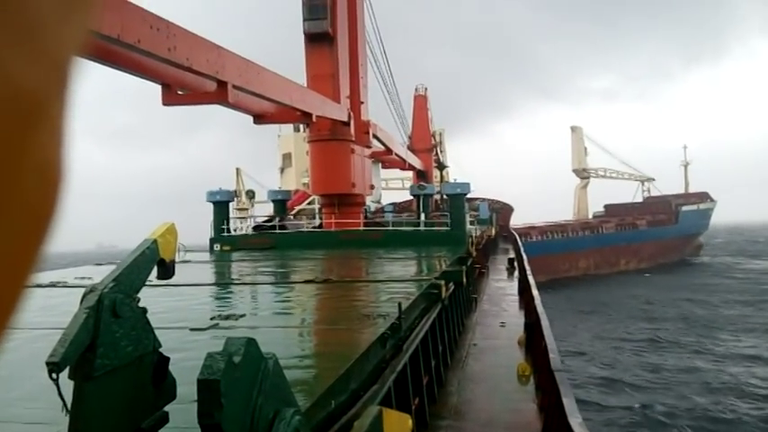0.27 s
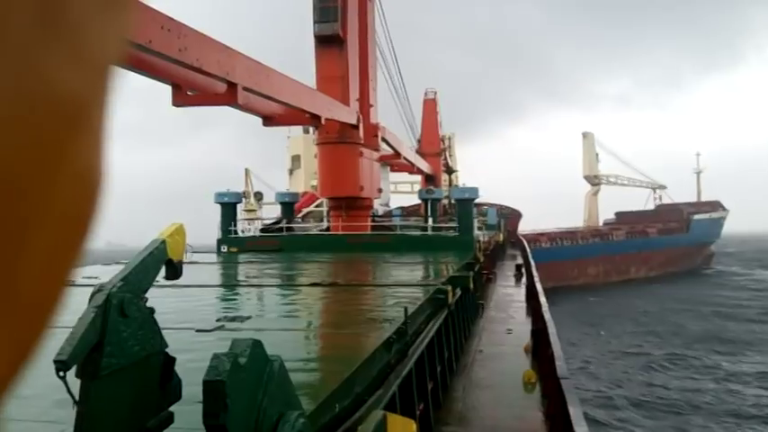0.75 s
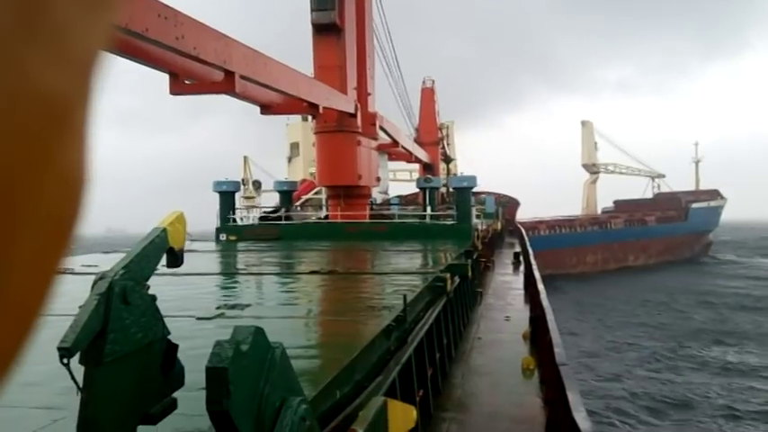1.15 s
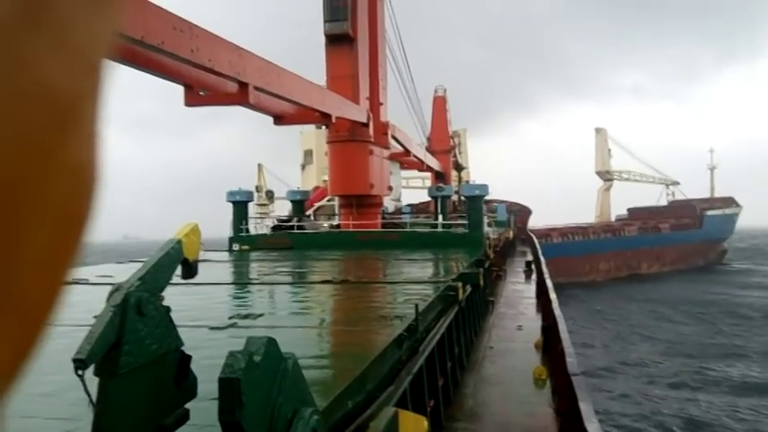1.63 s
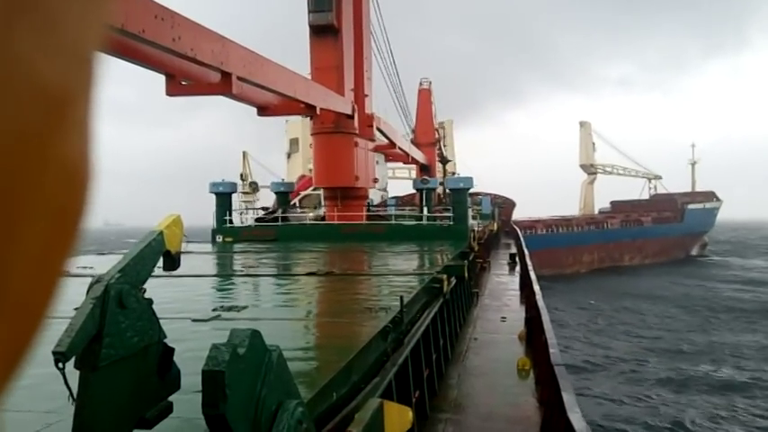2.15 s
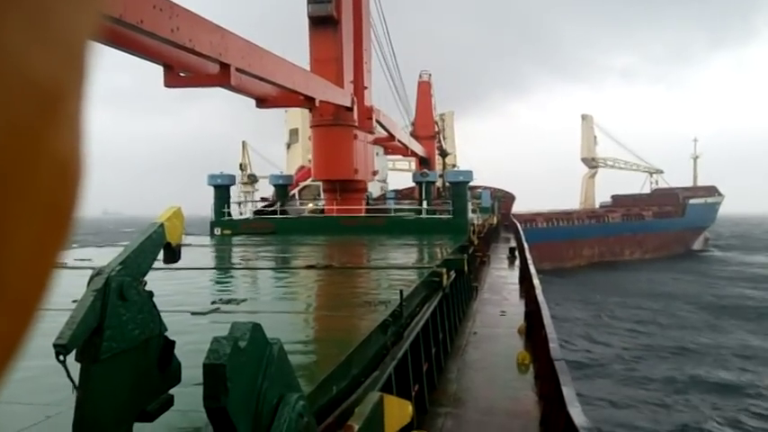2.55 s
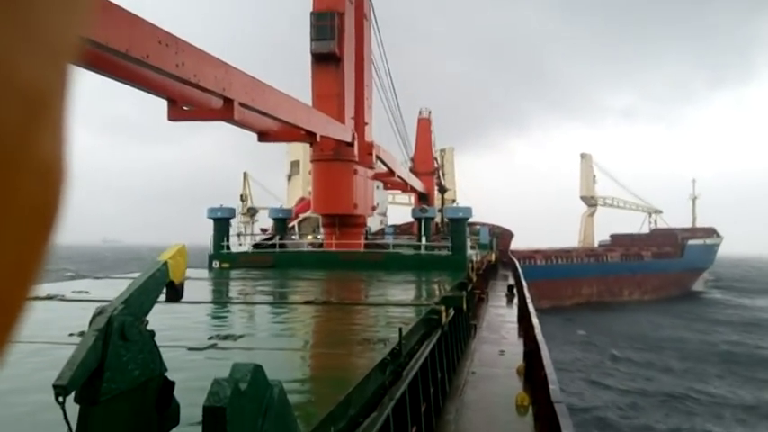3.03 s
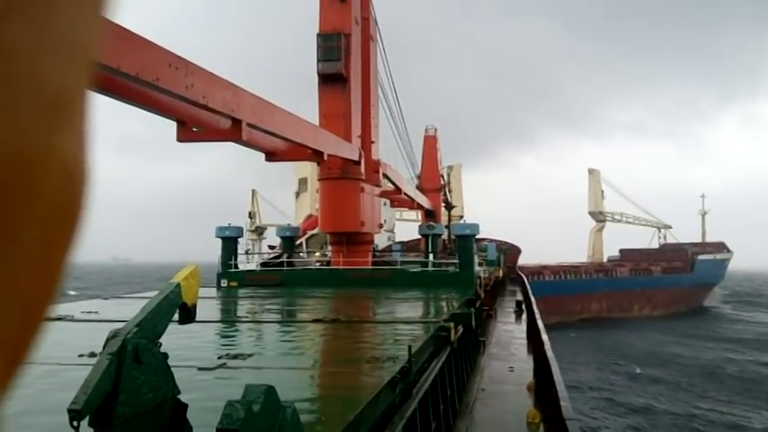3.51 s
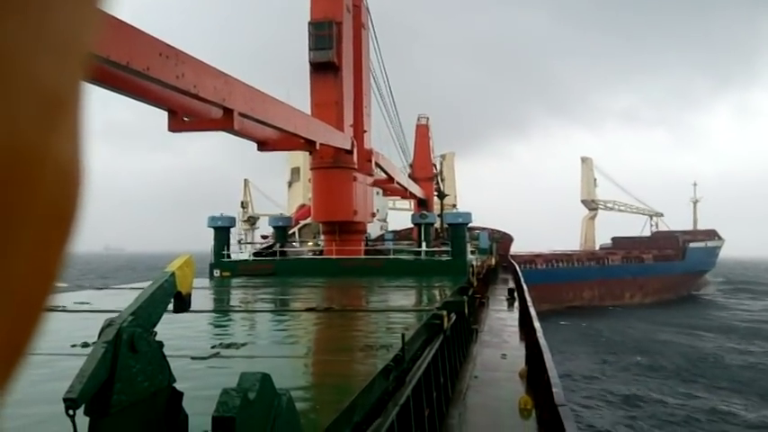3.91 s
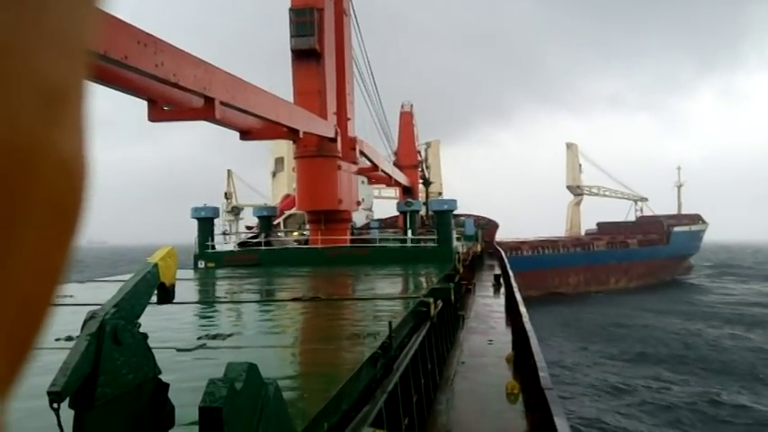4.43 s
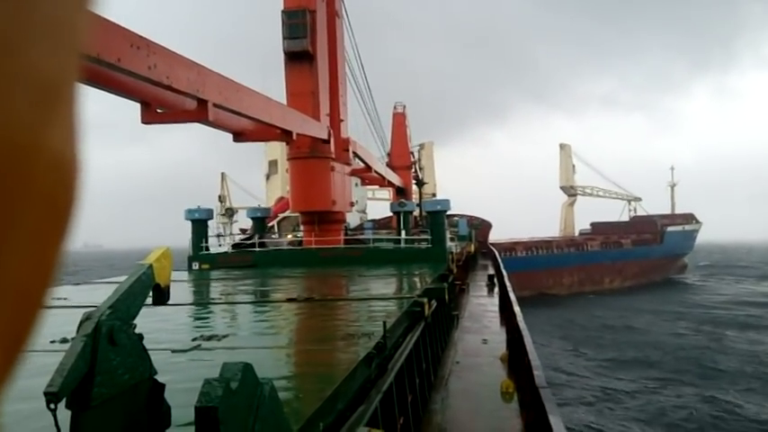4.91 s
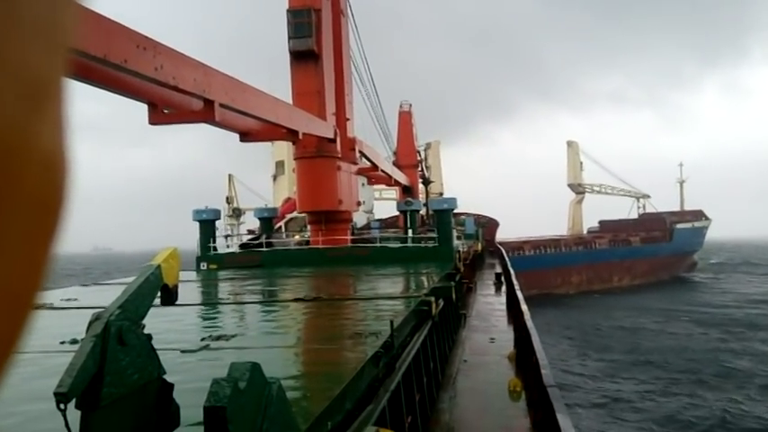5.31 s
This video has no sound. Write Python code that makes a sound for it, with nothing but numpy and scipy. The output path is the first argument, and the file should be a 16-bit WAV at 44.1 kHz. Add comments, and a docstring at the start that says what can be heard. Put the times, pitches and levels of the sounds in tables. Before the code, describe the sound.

On the open deck of a cargo ship in a gale, wind roars into a hand-held camera's two microphones. Low rumble and thumps differ left and right. Faint finger rubbing and a tiny spray tick open it, then gusts overload the right side with harsh crackles, worst near two seconds, before thinning to rougher rumble and a last brush of the hand.

```python
"""A gale on the open deck of a cargo ship buffets the two microphone ports of a hand-held camera.
From the start each port rumbles with its own flow and eddies, over a rush of sea and rigging that settles
after a surge. Fingers brush the case and a drop of spray ticks on it, both short filtered hisses. Strong
gusts then overload the input, with bursts of pressure spikes on the right port that reach into the treble;
later the spikes thin out, and one last, louder brush comes just before the end."""
import sys
import numpy as np
from scipy import signal
from scipy.fft import rfft, irfft, next_fast_len
from scipy.io import wavfile
from scipy.ndimage import uniform_filter1d, minimum_filter1d, map_coordinates

SR = 44100
rng = np.random.default_rng(int(sys.argv[2]) if len(sys.argv) > 2 else 0)


def wav_record(signal):
    """Record a signal, one row per channel, as 16-bit PCM in the file named by sys.argv[1]."""
    frames = np.transpose(np.atleast_2d(signal))
    bounded = np.clip(frames, -1, 1)
    # unit amplitude maps onto the largest positive 16-bit level
    quanta = np.round(bounded * 32767).astype(np.int16)
    wavfile.write(sys.argv[1], SR, quanta)


N = 245195

# a moderate wind (dB): the laws of brightness and of swing speed count from here
BREEZE_DB = -20


def amp(db):
    """Decibels to gain."""
    return 10 ** (np.asarray(db) / 20)


def unit(x):
    """x at rms 1."""
    return x / np.sqrt(np.mean(x ** 2) + 1e-20)


def along(points, hz):
    """(Hz, value) points read on a log frequency axis."""
    f, v = np.transpose(points)
    return np.interp(np.log(hz + 1), np.log(f + 1), v)


def clock():
    """Time of every sample in seconds."""
    return np.arange(N) / SR


def wobble(rate):
    """A smooth random curve of rms 1, with rate knots a second."""
    knots = rng.standard_normal(int(N * rate / SR) + 4)
    return unit(map_coordinates(knots, [np.arange(N) * rate / SR]))


def filtered(x, response):
    """x times a gain that depends on frequency."""
    m = next_fast_len(N + SR // 4)
    gain = response(np.fft.rfftfreq(m, 1 / SR))
    return irfft(rfft(x, m) * gain, m)[..., :N]


def noise(spectrum):
    """Noise of rms 1 with the given colour."""
    return unit(filtered(rng.standard_normal(N), lambda hz: amp(along(spectrum, hz))))


def spike(spectrum, size=1024):
    """A one-sided pressure spike with the given colour and the energy of a millisecond at rms 1."""
    log_gain = np.log(amp(along(spectrum, np.fft.rfftfreq(size, 1 / SR))))
    # folding the cepstrum forward in time gives minimum phase: the spike starts at once
    cepstrum = irfft(log_gain)
    cepstrum[1:size // 2] *= 2
    cepstrum[size // 2 + 1:] = 0
    shape = irfft(np.exp(rfft(cepstrum)))
    return shape / np.linalg.norm(shape) * np.sqrt(SR / 1000)


def gusts(flow):
    """Strength of the wind (dB) at every sample."""
    return np.interp(clock(), *np.transpose(flow))


def eddies(port, flow, big_corner_hz, small_corner_hz, small_db, spread_db, small_length, count=45):
    """Big eddies of one port, and small ones shed at random: (s, level dB, half length s, breeze corner Hz)."""
    # Big eddies, each a separate thump. Each row: time in seconds, level in dB before the port's trim,
    # half length in seconds, brightness in octaves from the port's corner, port that it hits.
    thumps = [(0.028, -14.5, 0.02, -0.5, "L"), (0.131, -5.5, 0.013, -0.1, "R"),
              (0.159, -3.5, 0.0045, -0.5, "R"), (0.188, -16.5, 0.01, -1, "L"),
              (0.297, -14, .014, -0.8, "R"), (0.367, -12.5, 0.017, 0.1, "L"),
              (0.394, -9.5, .012, -1.5, "R"), (0.512, -10.5, 0.012, 0.06, "R"),
              (0.603, -6.5, 0.011, -1, "R"), (0.636, 1, 0.0096, 1.2, "L"), (0.637, -10, 0.015, 0.5, "R"),
              (0.688, -10, 0.02, -0.5, "R"), (0.689, -9.5, 0.014, -0.5, "L"), (.73, -7.5, .008, -0.5, "R"),
              (0.785, -5.5, .007, 0, "L"), (0.807, 4, 0.0099, 0.5, "L"), (0.828, -3.5, 0.0091, 0.3, "R"),
              (0.852, -15, 0.0086, 2, "L"), (0.923, -3.5, 0.0051, 7, "L"), (0.905, -4.5, 0.011, 1, "R"),
              (0.971, 1, 0.0066, 0.6, "R"), (1.038, -3, 0.016, -1.3, "L"), (1.032, -12, 0.018, -2.5, "R"),
              (1.07, -5, .005, 0.5, "L"), (1.088, -4, .007, 2.1, "L"), (1.118, -12, 0.013, 1, "R"),
              (1.134, 0, 0.006, 1, "L"), (1.174, -10.5, 0.006, -6, "L"), (1.175, -5.5, 0.0046, -1.2, "R"),
              (1.218, -10.5, 0.014, -0.5, "R"), (1.327, -10, 0.019, -0.46, "R"),
              (1.354, -3, 0.0035, 1, "L"), (1.4, -16.5, 0.022, 0.4, "R"), (1.406, -7.5, 0.025, -1.5, "L"),
              (1.421, -7, .012, -2, "R"), (1.464, -2.5, 0.01, 0.3, "R"), (1.492, -7.5, 0.0086, -1, "L"),
              (1.525, -7.5, 0.017, 0, "R"), (1.526, -10.5, 0.0065, 0.5, "L"), (1.553, 3.5, 0.004, 8, "R"),
              (1.608, -6, 0.02, 0, "R"), (1.652, -5.5, 0.012, -0.2, "L"), (1.692, -7.5, 0.0047, 4.5, "R"),
              (1.717, -4, 0.01, -4, "R"), (1.747, -11, 0.039, 2.6, "R"), (1.748, -3, 0.0088, -1, "L"),
              (1.809, -12.5, 0.016, -0.8, "L"), (1.844, -6, 0.024, -0.4, "R"), (1.875, -7, 0.015, 2, "L"),
              (1.897, 3.5, 0.012, 8, "R"), (1.922, -6.5, 0.0035, 3, "R"), (1.936, -10, 0.012, 0.5, "L"),
              (1.961, -6.5, 0.025, -0.5, "R"), (1.965, -9.5, 0.0085, .4, "L"), (2.03, -8, 0.015, -0.1, "L"),
              (2.006, -4.5, 0.0073, 1.5, "R"), (2.04, -8.5, 0.0084, 2, "R"), (2.081, -0.5, 0.012, 13, "R"),
              (2.121, -14, 0.015, 1.8, "R"), (2.147, -0.5, 0.0084, -3, "R"),
              (2.177, -2.5, 0.003, -1.3, "R"), (2.206, -9.5, 0.015, -0.5, "L"),
              (2.221, -9.5, 0.012, -1.48, "R"), (2.267, -12.5, 0.0043, -0.3, "R"),
              (2.3, -0.5, 0.0033, -1.2, "R"), (2.338, -7, 0.023, -0.5, "R"), (2.466, -6, 0.018, 0.5, "L"),
              (2.472, -6, 0.015, -0.3, "R"), (2.499, -10.5, 0.008, 1.5, "L"), (2.532, -11, 0.027, -.5, "R"),
              (2.544, -12, 0.01, -0.5, "L"), (2.576, -2.5, 0.0096, 0.3, "R"),
              (2.61, -11.5, 0.0064, -2.2, "R"), (2.627, -5, 0.0049, -0.7, "R"),
              (2.66, -9.5, 0.027, -2, "L"), (2.653, -8, 0.016, -1, "R"), (2.722, -2, 0.0075, 0.6, "R"),
              (2.747, -11, 0.021, -1, "R"), (2.765, -18.5, .011, 0, "L"), (2.826, -5.5, 0.0065, -0.5, "R"),
              (2.848, -11, 0.0074, -0.6, "R"), (2.88, -8, 0.021, -0.6, "L"), (2.905, -4, 0.012, -0.5, "R"),
              (2.943, -5.5, 0.007, -0.5, "R"), (2.977, -10, 0.016, -0.5, "R"),
              (3.024, -7.5, 0.0075, -0.5, "L"), (3.062, -8.5, 0.017, -0.5, "R"),
              (3.079, -9.5, 0.018, 0, "L"), (3.121, -9, 0.0067, 0.5, "R"), (3.139, -5, 0.014, -0.3, "L"),
              (3.221, -8, 0.018, -0.52, "R"), (3.422, -7, 0.015, 0, "L"), (3.417, -14.5, 0.017, 0, "R"),
              (3.456, -12.5, 0.0076, -0.4, "R"), (3.511, -5, 0.003, 0, "L"),
              (3.548, -5.5, 0.005, -0.6, "R"), (3.552, -9.5, 0.019, 0, "L"), (3.587, -11, 0.015, -1, "R"),
              (3.651, -7, 0.012, -1, "R"), (3.673, -12.5, 0.0088, -0.1, "L"),
              (3.684, -10, 0.0059, -1.5, "R"), (3.724, -12, 0.029, -0.65, "R"),
              (3.771, -0.5, 0.0046, 0, "R"), (3.81, -11, 0.017, -1.5, "R"), (3.827, -17, 0.018, -1, "L"),
              (3.835, -3, 0.0066, -1, "R"), (3.855, -12, .01, -0.3, "R"), (3.904, -9.5, 0.0033, -1.5, "R"),
              (4, -18, 0.023, -0.5, "R"), (4.076, -9.5, 0.0062, -0.8, "R"),
              (4.136, -1.5, 0.0029, -0.6, "R"), (4.169, -12, .008, -0.74, "R"),
              (4.228, -10.5, 0.0062, -2, "R"), (4.197, -10.5, 0.0079, -1, "L"),
              (4.271, -18.5, 0.045, -0.7, "R"), (4.285, -16, 0.0087, -0.5, "L"),
              (4.331, -6, .015, -1.1, "R"), (4.367, -9, 0.012, -0.4, "R"), (4.384, -7, 0.0095, -0.95, "R"),
              (4.375, -13.5, 0.012, -2.5, "L"), (4.42, -3.5, 0.0053, 0, "R"),
              (4.509, -14, 0.032, -0.4, "R"), (4.557, -12.5, 0.0078, -.5, "R"),
              (4.575, -1, 0.0082, 0.1, "L"), (4.58, -11, 0.0056, 1, "R"), (4.619, -0.5, 0.0024, 0, "R"),
              (4.662, -8.5, 0.0061, 0, "R"), (4.689, -9, 0.0046, 1.5, "L"), (4.725, -8, 0.026, -0.5, "L"),
              (4.766, -12.5, 0.02, -1.5, "L"), (4.808, -10, 0.015, -0.1, "L"),
              (4.828, -18, 0.012, -0.5, "R"), (4.879, -12, 0.009, -1.8, "R"),
              (4.894, -15, 0.0075, 0.13, "R"), (4.916, -12.5, .014, -0.5, "L"),
              (4.985, -8.5, 0.0028, -.5, "L"), (5.007, -13, 0.011, -.5, "R"), (5.044, 4, 0.0039, -0.5, "R"),
              (5.083, -13.5, 0.009, 0.1, "R"), (5.062, -10, 0.007, 0, "L"), (5.086, -8.5, 0.018, -1, "L"),
              (5.136, -11.5, 0.0051, -0.3, "R"), (5.234, -10, 0.013, 0, "R"), (5.338, -10.5, 0.012, 1, "L"),
              (5.372, -6.5, 0.011, 0, "L"), (5.443, -18, 0.0071, 2.6, "R"), (5.446, -9, 0.0078, -1.5, "L")]
    big = [(s, db, length, big_corner_hz * 2 ** octaves)
           for s, db, length, octaves, side in thumps if side == port]
    times = (np.arange(count) + rng.random(count)) / count * N / SR
    size, stretch = np.clip(rng.standard_normal((2, count)), -2, 2)
    levels = np.interp(times, *np.transpose(flow)) + small_db + spread_db * size
    lengths = small_length * 2 ** (stretch / 2)
    return big + list(zip(times, levels, lengths, np.full(count, small_corner_hz)))


def turbulence(count=14):
    """Port noise cut into overlapping bands: their centres (Hz) and their waveforms."""
    # Turbulent pressure at a port, before the corner takes the treble away.
    # Each row: frequency in Hz, relative level in dB per Hz.
    port_colour = [(20, -25.5), (32, -26), (55, -8.5), (85, -2.5), (150, -1.5), (300, -6), (1000, -10),
                   (2200, -13.5), (4500, -19), (8000, -26), (16000, -23)]
    centres = np.geomspace(40, 14000, count)

    def split(hz):
        """Overlapping triangles on a log axis, which add up to 1."""
        return np.array([np.interp(np.log(hz + 1), np.log(centres), row) for row in np.eye(count)])

    pressure = noise(port_colour)
    # even out its slow swells, so that flow and eddies alone set the level
    pressure /= np.sqrt(np.abs(uniform_filter1d(pressure ** 2, size=SR // 50)) + 1e-9)
    return centres[:, None], filtered(pressure, split)


def buffet(flow, whirls, calm_corner_hz, top_corner_hz, doubling_db, flow_db, eddy_db, swirl_db,
           swirl_brightens, eddy_follows, flutter_db, tear_db, steepness):
    """Wind on one port: faster air holds smaller whirls, so it is both louder and brighter."""
    t = clock()
    centres, bands = turbulence()
    share = np.mean(bands * bands.sum(0), axis=1, keepdims=True)

    def colour(breeze_corner_hz, gust_db):
        """Power gain of each band, keeping the total, for a roll-off whose corner rises with the gust."""
        free_hz = breeze_corner_hz * 2 ** ((gust_db - BREEZE_DB) / doubling_db)
        corner_hz = free_hz / np.hypot(1, free_hz / top_corner_hz)
        power = (1 + (centres / corner_hz) ** 2) ** -steepness
        return power / np.sum(power * share, axis=0)

    wind_db = gusts(flow)
    swirl = swirl_db * wobble(36)
    flow_power = amp(wind_db + swirl + flow_db) ** 2
    power = flow_power * colour(calm_corner_hz, wind_db + swirl_brightens * swirl)

    for s, db, length, corner_hz in whirls:
        near = slice(*np.searchsorted(t, [s - 3 * length, s + 3 * length]))
        age = (t[near] - s) / length
        # an eddy arrives as a steep front and leaves gradually
        front = .5 + .5 * np.tanh(7 * (age + 0.71))
        envelope = front * np.exp(-age ** 2)
        # its brightness follows the gust that carries it by the share eddy_follows
        carried_db = BREEZE_DB + eddy_follows * (np.interp(s, t, wind_db) - BREEZE_DB)
        power[:, near] += amp(db + eddy_db) ** 2 * envelope * colour(corner_hz, carried_db)

    # small whirls come in clumps of a few milliseconds, the more so the higher they sound
    smallness = centres / (centres + 600)
    clump_db = flutter_db * wobble(110) + tear_db * wobble(450)
    # peaks are held to 8 dB before each band returns to rms 1
    clumps = amp(smallness * np.minimum(clump_db, 8))
    clumps /= np.sqrt(np.mean(clumps ** 2, axis=1, keepdims=True))
    return np.sum(bands * np.sqrt(power) * clumps, axis=0)


def sea(spectrum, level_db, swell_db, flicker_db):
    """Breaking waves and wind in the rigging: a rush that settles after a surge and whose treble flickers."""
    surge_start_db, surge_end_db, surge_fall_s = 5.5, 0.4, 0.57  # relative to level_db; time constant
    rush = noise(spectrum)
    body = filtered(rush, lambda hz: 1 / (1 + (hz / 4500) ** 6))
    hiss = (rush - body) * amp(flicker_db * wobble(27))
    surge_db = surge_end_db + (surge_start_db - surge_end_db) * np.exp(-clock() / surge_fall_s)
    swell = swell_db * wobble(6.4)
    return amp(level_db + surge_db + swell) * (body + hiss)


def brushes():
    """Short hisses of skin sliding on the case, some airier than others."""
    # Strokes of the fingers. Each row: time of the peak in seconds, level in dB as heard on the near side,
    # rise and fall time constants in seconds, extra air above 8.5 kHz in dB.
    strokes = [(.01, -49, 0.028, 0.024, 0), (.11, -42, 0.023, .025, 3), (4.62, -48, 0.15, 0.15, 0.5),
               (5.156, -51, .008, .022, 14), (5.493, -32, 0.0057, 0.028, -0.5)]
    # Hiss of a stroke. Each row: frequency in Hz, relative level in dB per Hz.
    skin_colour = [(800, -19.5), (2000, 1), (3500, 8), (6500, -6.5), (8500, -24), (12000, -7), (15500, -12)]
    t = clock()
    hiss = noise(skin_colour)
    air = filtered(hiss, lambda hz: hz > 8500)
    total = np.zeros(N)
    for s, db, rise, fall, air_db in strokes:
        envelope = np.exp(-np.maximum((s - t) / rise, (t - s) / fall))
        total += amp(db) * envelope * (hiss - air + amp(air_db) * air)
    return total


def crackle(flow, onset_db, width_db, peak_db, growth, spread_db, edge_db, count=700):
    """Lesser cracks, denser and harder as a gust climbs past the onset: (s, pop dB, edge dB)."""
    place, chance, size = rng.random((count, 3)).T
    times = (np.arange(count) + place) / count * N / SR
    over_db = np.interp(times, *np.transpose(flow)) - onset_db
    torn = chance < .5 + .5 * np.tanh(over_db / width_db)
    levels = (peak_db + growth * over_db + spread_db * (2 * size - 1))[torn]
    return list(zip(times[torn], levels, levels + edge_db))


def cracks(rows, pop_db, edge_db, slap_db, slap_rise, slap_fall, slap_growth,
           tear_length, tear_doubling_db, count=3):
    """Sharp pressure swings overload the port: a pop, a dull slap and a clipped edge, longer if harder."""
    # Pop of a crack. Each row: frequency in Hz, relative level in dB per Hz.
    pop_colour = [(150, -3), (500, 2), (1000, 2.5), (1500, -3), (2400, -8), (3500, -20.5), (6000, -55),
                  (10000, -72.5)]
    # Hard clipped edge of a crack. Each row: frequency in Hz, relative level in dB per Hz.
    edge_colour = [(200, -17), (1000, -5), (2700, 9), (5000, -0.5), (7000, -9), (10000, -16.5),
                   (15500, -24.5)]
    # Dull slap that comes with a crack. Each row: frequency in Hz, relative level in dB per Hz.
    slap_colour = [(80, -3.5), (250, -3.5), (900, -8), (2000, -18.5), (4000, -40.5), (9000, -64.5)]
    # time between swings in a breeze, its scatter between cracks, loss per swing
    swing_s, scatter_octaves, swing_loss_db = .00055, 0.5, 2.5
    swing_halving_db = 15  # gain in level that halves the time between swings
    hard_db = -40  # an edge of middling hardness: the length of a tear counts from here

    def sample_at(seconds):
        return np.clip((seconds * SR).astype(int), 0, N - 1)

    t = clock()
    pops, edges, slaps = np.zeros((3, N))
    swing = np.arange(count)
    sizes = (-1) ** swing * amp(-swing_loss_db * swing)
    sizes /= np.linalg.norm(sizes)
    snap = np.arange(2 * count)
    chances = rng.uniform(-1, 1, (len(rows), 2 * count + 2))
    for (s, db, row_edge_db), chance in zip(rows, chances):
        # a stronger crack swings faster
        gap = swing_s * 2 ** (scatter_octaves * chance[0] - (db - BREEZE_DB) / swing_halving_db)
        at = sample_at(s + gap * (swing - 1 + chance[2:2 + count] / 4))
        pops[at] += np.sign(chance[1]) * sizes * amp(db + pop_db)

        # the edge is a run of snaps of alternate sign, scattered over the tear
        hardness = 2 ** ((row_edge_db - hard_db) / tear_doubling_db)
        place = (snap + .5 + chance[2:] / 2) / len(snap) - .5
        at = sample_at(s + tear_length * hardness * place)
        edges[at] += (-1) ** snap * amp(row_edge_db + edge_db) * np.sqrt(hardness / len(snap))

        near = slice(*np.searchsorted(t, [s - .02, s + .04]))
        age = t[near] - s
        envelope = np.exp(-np.maximum(-age / slap_rise, age / slap_fall))
        slaps[near] += amp(slap_growth * db + slap_db) * envelope
    snaps = signal.fftconvolve(pops, spike(pop_colour)) + signal.fftconvolve(edges, spike(edge_colour))
    return snaps[:N] + slaps * noise(slap_colour)


def drop(level_db, t60):
    """A drop of spray on the case: a dry tick of noise that falls 60 dB in t60 seconds."""
    # Sound of the tick. Each row: frequency in Hz, relative level in dB per Hz.
    tick_colour = [(600, -25), (2000, -0.5), (4500, 0.5), (8500, -10), (12500, -4), (15500, -5)]
    age = clock() - .413
    return (age > 0) * amp(level_db - 60 * np.abs(age) / t60) * noise(tick_colour)


def scene():
    """The ports share no turbulence; the right one faces the wind, the hand is on the left."""
    # Strength of the gusts over each port. Each row: time in seconds, level in dB before the flow trim.
    left_flow = [(0, -31), (.3, -18.5), (.52, -35), (.68, -17), (1.139, -12.5), (1.25, -19.5), (1.5, -15),
                 (2.2, -17), (2.4, -27), (2.62, -15.5), (2.8, -21), (3.0, -17), (3.2, -18), (3.35, -25),
                 (3.7, -20), (4.15, -21), (4.5, -23.5), (4.8, -11.5), (5.2, -18.5), (5.3, -27),
                 (5.42, -13.5), (5.56, -35)]
    right_flow = [(0, -19), (.28, -16), (.46, -26.5), (.62, -15), (.76, -17.5), (0.831, -13),
                  (0.992, -10.5), (1.051, -17), (1.29, -18), (1.5, -16), (1.76, -12.5), (1.82, -17.5),
                  (1.92, -10.5), (2.1, -12), (2.2, -16), (2.419, -18), (2.6, -15.5), (2.98, -17.5),
                  (3.35, -23.5), (3.75, -14.5), (4.2, -19), (4.37, -16.5), (4.72, -20.5), (5.06, -19.5),
                  (5.34, -31), (5.56, -26.5)]
    # Rush of sea and rigging on each side. Each row: frequency in Hz, relative level in dB per Hz.
    left_sea = [(60, -14), (300, 10), (550, -2.5), (900, -5.5), (1400, -9), (2500, -12), (3400, -19.5),
                (4100, -25.5), (6000, -36.5), (8500, -57), (12000, -41), (15500, -46)]
    right_sea = [(60, -11), (300, 8.5), (550, 3), (900, -1), (1400, -15), (2500, -19), (3700, -21),
                 (4300, -32), (6000, -33.5), (8500, -52.5), (12000, -42.5), (15500, -54)]
    # Sharp pressure swings that overload the windward port. Each row: time in seconds,
    # level of the pop in dB and of its hard edge in dB, both before their trims.
    sharp_swings = [(0.123, -18, -64.5), (0.137, -20, -65), (0.159, -22.5, -55.5), (0.605, -21.5, -45),
                    (0.636, -0.5, -41.5), (0.661, -18.5, -63), (0.678, -17, -66), (0.697, -23, -65),
                    (0.72, -25, -68.5), (0.729, -18.5, -66), (0.745, -17, -43), (0.819, -12.5, -70),
                    (0.831, -12.5, -36), (0.84, -26.5, -45), (0.853, -8.5, -51), (0.876, -10.5, -56.5),
                    (0.917, -12.5, -34.5), (0.945, -24, -66), (0.971, -9, -45.5), (0.98, -16.5, -42.5),
                    (1.006, -12.5, -43.5), (1.016, -13.5, -41.5), (1.112, -22.5, -55.5), (1.12, -18, -42),
                    (1.134, -18, -66.5), (1.215, -26, -67.5), (1.223, -31, -67), (1.324, -25.5, -62),
                    (1.334, -22, -61.5), (1.355, -21.5, -64.5), (1.368, -19, -65), (1.388, -20.5, -70),
                    (1.414, -23, -58.5), (1.463, -5, -50.5), (1.48, -23, -69), (1.528, -15, -63.5),
                    (1.545, -7, -29.5), (1.555, -13, -32.5), (1.583, -16, -33), (1.592, -9.5, -58.5),
                    (1.615, -11, -40), (1.639, -25.5, -66), (1.673, -14, -63), (1.686, 0, -30.5),
                    (1.702, -13, -47.5), (1.71, -18.5, -34.5), (1.728, -7.5, -44.5), (1.733, -13.5, -34.5),
                    (1.741, -28, -42), (1.751, -13.5, -50), (1.762, -11, -38), (1.769, -27, -38),
                    (1.789, -13.5, -43), (1.81, -26, -61), (1.852, -11, -42.5), (1.878, -4.5, -39),
                    (1.895, -13, -21.5), (1.908, 1.5, -27), (1.916, -3.5, -28.5), (1.946, -23.5, -43),
                    (1.969, -12.5, -45), (1.989, -11, -46), (2.005, -8.5, -57), (2.032, -9.5, -47.5),
                    (2.039, -4.5, -38.5), (2.046, -11, -41), (2.079, -18, -38), (2.095, -18, -29.5),
                    (2.122, -11.5, -58.5), (2.134, -27.5, -40), (2.159, -22.5, -61), (2.179, -18.5, -41),
                    (2.3, -14.5, -39), (2.33, -12.5, -46), (2.346, -13.5, -44), (2.449, -20.5, -62),
                    (2.475, -15, -54), (2.488, -19.5, -41.5), (2.564, -14, -37), (2.581, -5, -45.5),
                    (2.59, -8.5, -37.5), (2.599, -16.5, -66.5), (2.629, -17, -46.5), (2.652, -17.5, -46.5),
                    (2.715, -21, -54), (2.722, -15, -36), (2.743, -21.5, -70), (2.825, -14, -44),
                    (2.856, -19.5, -65), (2.891, -12.5, -63), (2.903, -5, -36.5), (2.943, -16, -59),
                    (2.975, -16, -55.5), (3.118, -26, -62), (3.463, -23, -63), (3.544, -13.5, -58),
                    (3.587, -20.5, -64.5), (3.651, -16, -65), (3.717, -16.5, -64.5), (3.732, -22, -67),
                    (3.751, -18.5, -61.5), (3.766, -11, -50), (3.8, -17.5, -45), (3.807, -18.5, -66),
                    (3.836, -21, -65), (3.864, -18.5, -65.5), (3.874, -20, -62), (4.32, -18, -68.5),
                    (4.329, -10, -59.5), (4.342, -17, -66), (4.367, -15.5, -66), (4.385, -10.5, -39.5),
                    (4.414, -23, -65), (4.422, -17, -43), (4.491, -23, -67.5), (4.499, -16.5, -64),
                    (4.618, -17, -68.5), (4.662, -18.5, -65), (5.043, -16.5, -62), (5.091, -26, -63),
                    (5.442, -22, -50.5)]

    left_whirls = eddies("L", left_flow, big_corner_hz=356, small_corner_hz=211, small_db=-3.0,
                         spread_db=2.5, small_length=0.014)
    right_whirls = eddies("R", right_flow, big_corner_hz=980, small_corner_hz=300, small_db=-0.5,
                          spread_db=0.0, small_length=0.0079)
    left = buffet(left_flow, left_whirls, calm_corner_hz=215, top_corner_hz=990, doubling_db=32.5,
                  flow_db=-0.5, eddy_db=1.5, swirl_db=3.0, swirl_brightens=0.85, eddy_follows=0.31,
                  flutter_db=2.5, tear_db=8.0, steepness=2.27)
    right = buffet(right_flow, right_whirls, calm_corner_hz=294, top_corner_hz=2260, doubling_db=6.0,
                   flow_db=-1.24, eddy_db=-1.43, swirl_db=2.5, swirl_brightens=0.88, eddy_follows=0.99,
                   flutter_db=6.0, tear_db=10.5, steepness=2.9)

    left = left + sea(left_sea, level_db=-33.5, swell_db=-0.5, flicker_db=0.4)
    right = right + sea(right_sea, level_db=-35.5, swell_db=0.8, flicker_db=5.5)
    left = left + brushes()
    right = right + amp(-6.5) * brushes()

    right_cracks = list(sharp_swings) + crackle(right_flow, onset_db=-12.5, width_db=1.16, peak_db=-19,
                                                growth=1.0, spread_db=4.5, edge_db=-39.5)
    right = right + cracks(right_cracks, pop_db=3.0, edge_db=15, slap_db=-2.5, slap_rise=0.0011,
                           slap_fall=0.0024, slap_growth=0.67, tear_length=.0026, tear_doubling_db=14)
    left = left + drop(level_db=-19.0, t60=0.0026)
    return np.array([left, right])


def record(dry):
    """One limiter ducks both channels around an overload; what slips past it clips at full scale."""
    threshold = 1.426
    needed = np.minimum(1, threshold / (np.abs(dry).max(0) + 1e-9))
    # the duck starts a little early and is held a few milliseconds, then its corners are smoothed
    held = minimum_filter1d(needed, size=SR // 140, origin=SR // 800)
    limited = dry * uniform_filter1d(held, size=SR // 250)
    hardness = 8  # sharpness of the bend into clipping
    clipped = limited / (1 + np.abs(limited) ** hardness) ** (1 / hardness)
    return filtered(clipped, lambda hz: hz < 15800)


dry = scene()
out = record(dry)
wav_record(out)
```